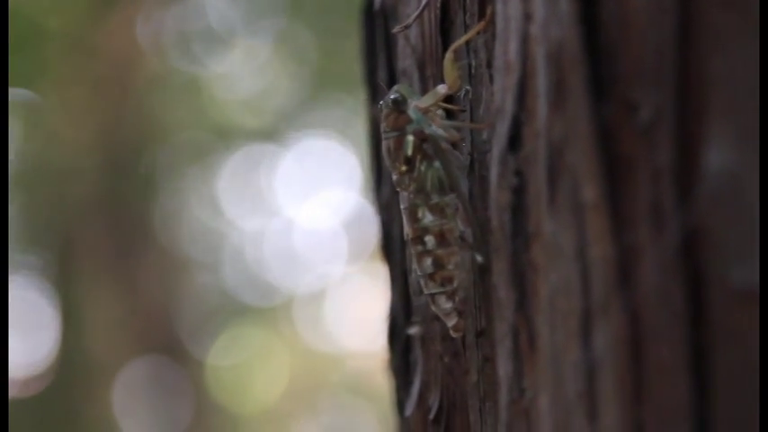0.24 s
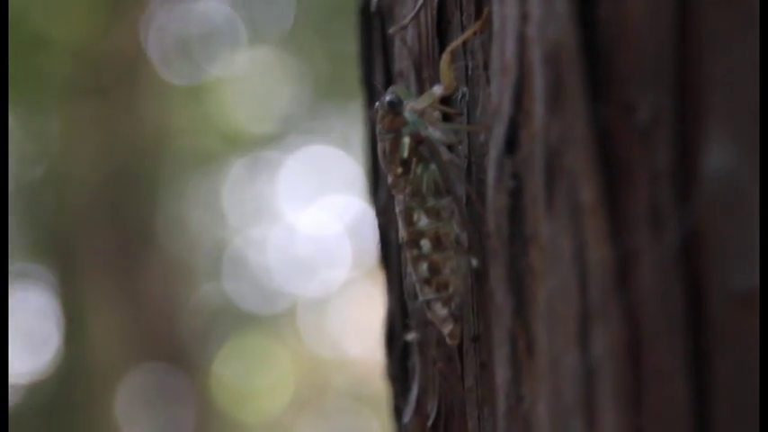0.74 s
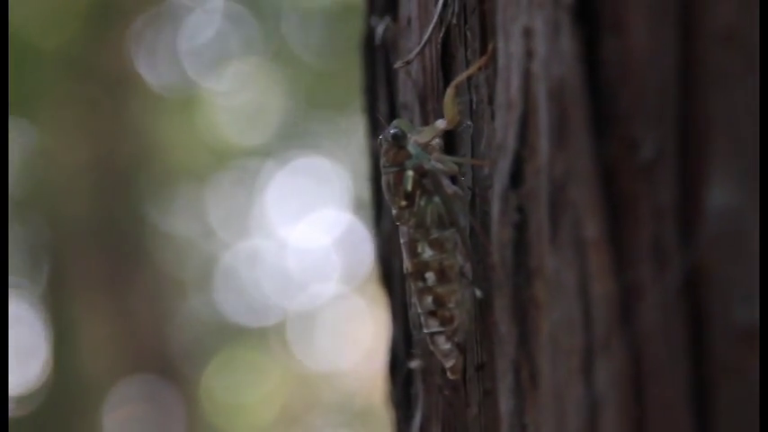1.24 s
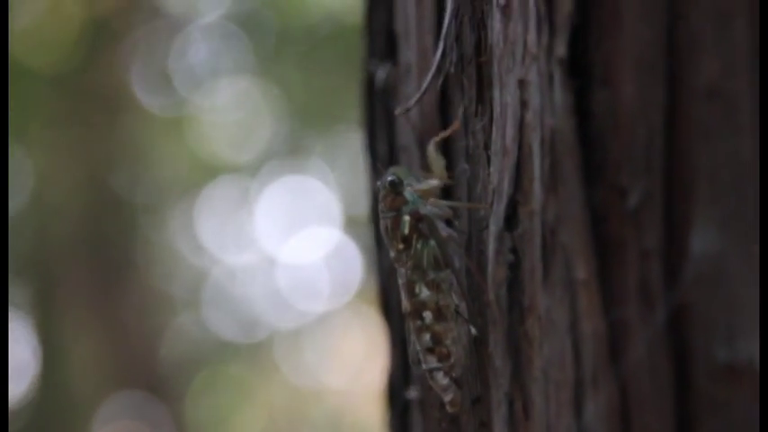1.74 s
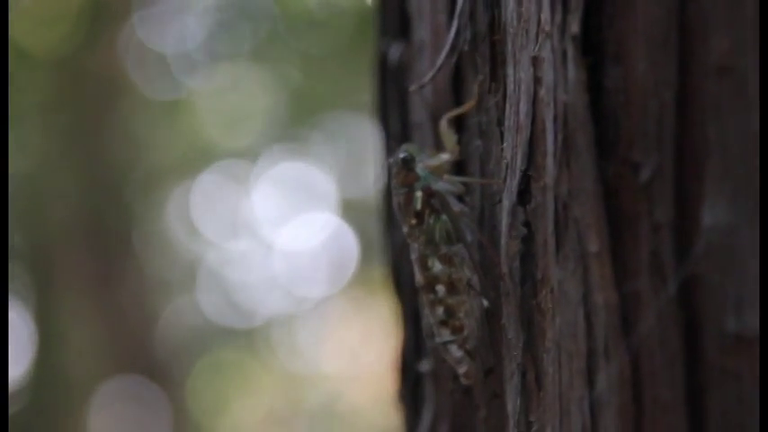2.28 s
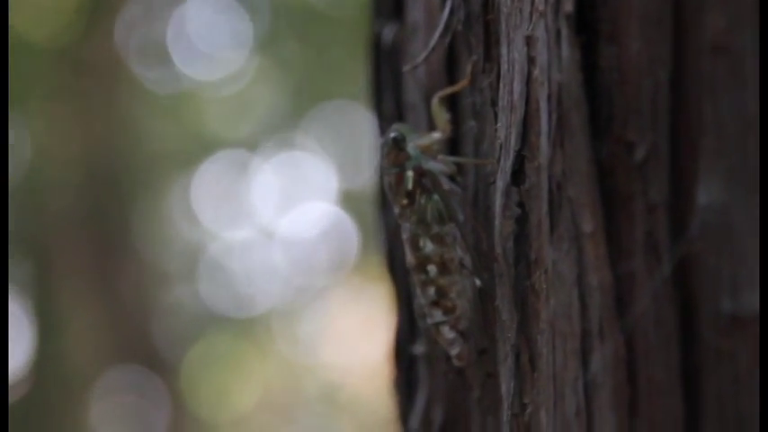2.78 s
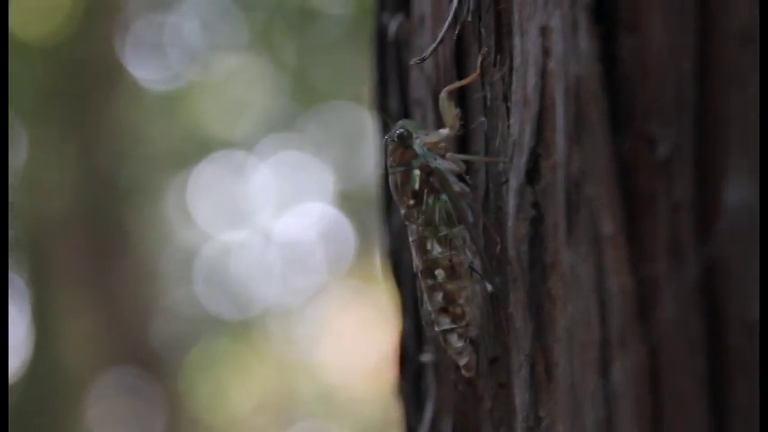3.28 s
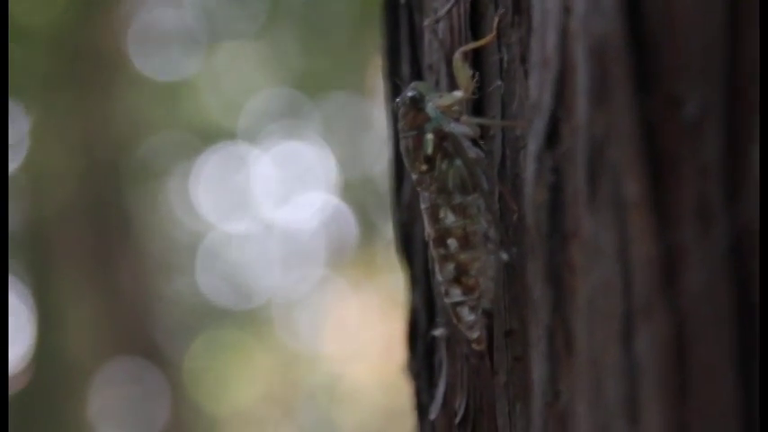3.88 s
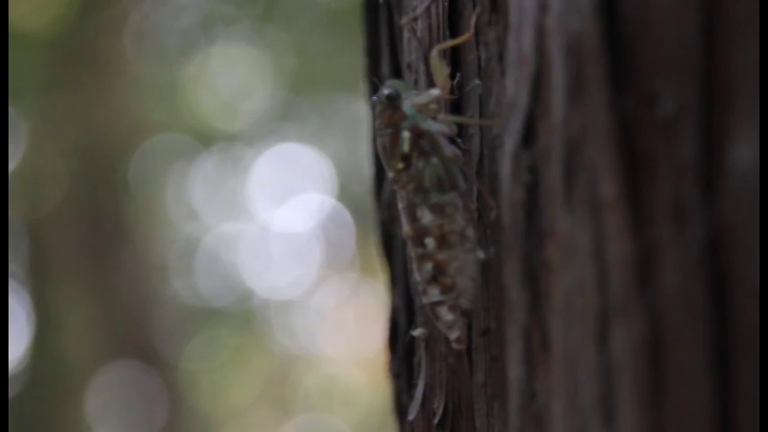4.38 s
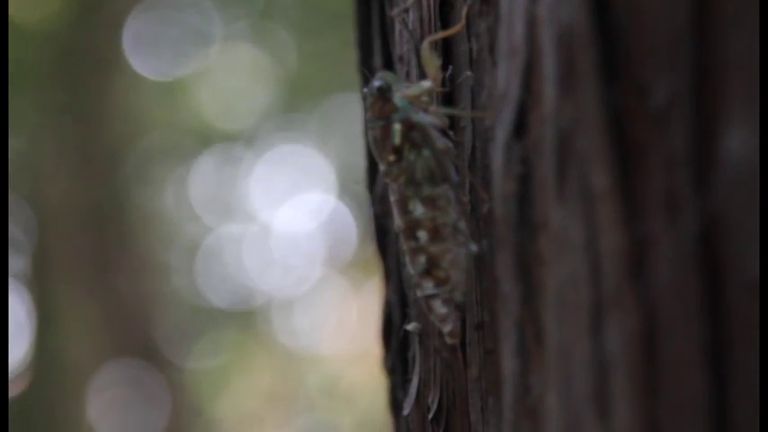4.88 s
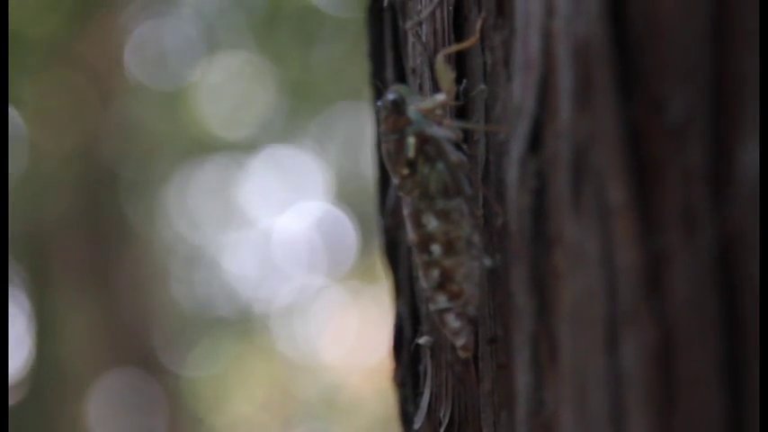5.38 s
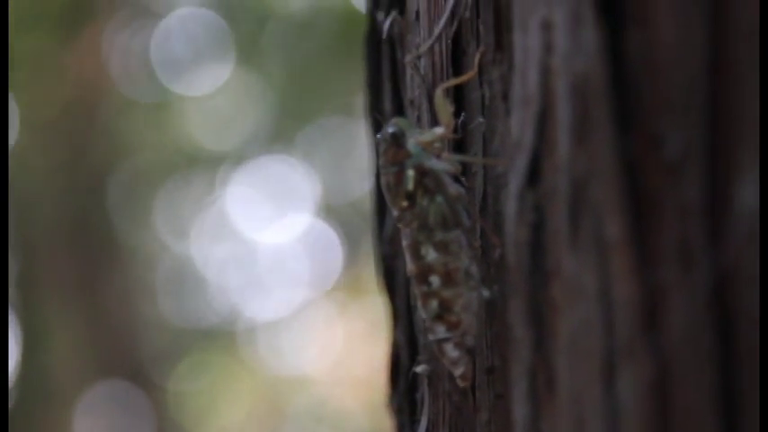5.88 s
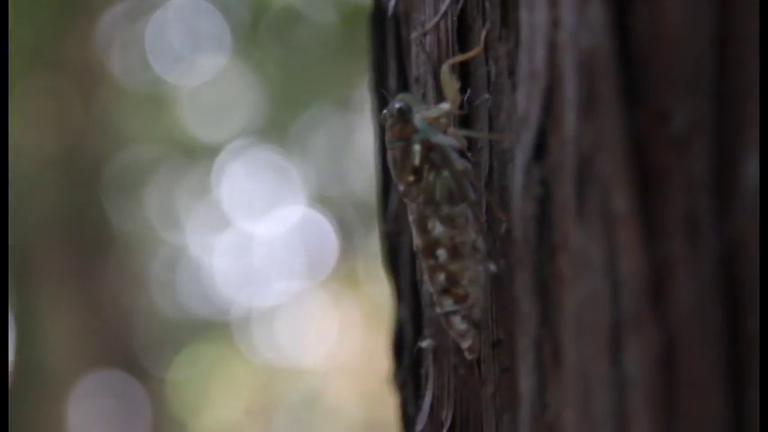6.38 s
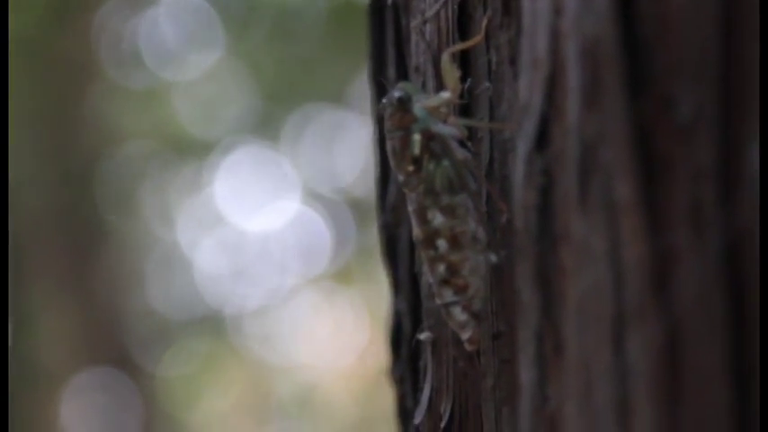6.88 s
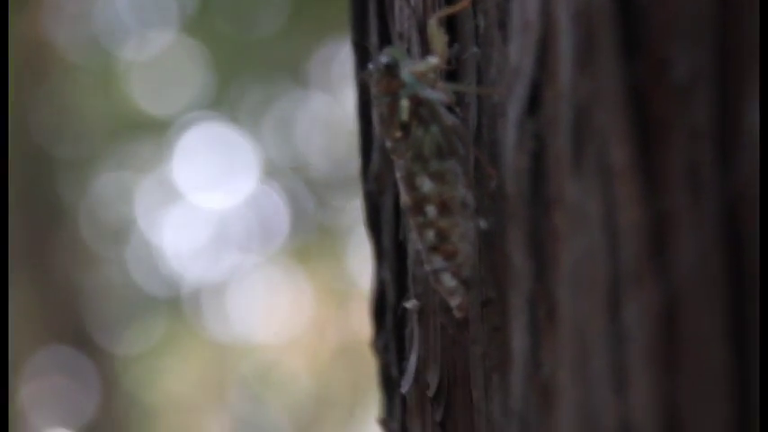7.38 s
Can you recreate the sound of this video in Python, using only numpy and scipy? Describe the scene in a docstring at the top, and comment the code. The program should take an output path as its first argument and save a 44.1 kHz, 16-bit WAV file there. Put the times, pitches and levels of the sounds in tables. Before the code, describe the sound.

A cicada chorus hisses steadily in a forest under a very high throbbing buzz. A cicada some trees away gives a fading run of quick ringing notes. Then one right by the microphone swells into a loud, rapidly pulsing call, slowing slightly before it stops suddenly. The chorus swells back and a far cicada answers faintly. Hands bump and rub the microphone dully, mostly near the end.

```python
"""Evening cicadas call in slowing runs of ringing notes: some trees away, then close, then far off.
Tymbal clicks ring the abdomen; each call warms up, peaks and tires, which sets the pitch, length
and colour of its notes. Behind them a cicada chorus hisses, a high insect buzz throbs and a far bird
whistles over faint forest air. Hands bump and rub the camera body; its gain control ducks the forest
under the close call and lets it swell back."""
import sys
import numpy as np
from scipy import signal
from scipy.fft import rfft, irfft, next_fast_len
from scipy.io import wavfile
from scipy.ndimage import uniform_filter1d, minimum_filter1d, map_coordinates

SR = 44100
rng = np.random.default_rng(int(sys.argv[2]) if len(sys.argv) > 2 else 0)


def transcribe(u):
    """Save the signal u as a 16-bit wav file named by the first command-line argument.

    u: samples, shape (n,) or (channels, n), limited to [-1, 1]; the rate is SR.
    q: integer samples, one column per channel.
    """
    v = np.clip(np.atleast_2d(u).T, -1, 1)
    q = np.round(v * 32767).astype(np.int16)
    wavfile.write(sys.argv[1], SR, q)


N = 336924

# Close cicada. Each entry: note onset in seconds.
NEAR_ONSETS_S = [3.495, 3.576, 3.662, 3.744, 3.825, 3.908, 3.985, 4.068, 4.153, 4.24, 4.330, 4.42, 4.514,
                 4.609, 4.706, 4.811, 4.911, 5.006, 5.111, 5.218, 5.329, 5.451, 5.592, 5.738]
# Cicada some trees away. Each entry: note onset in seconds.
MIDWAY_ONSETS_S = [1.250, 1.335, 1.415, 1.492, 1.565, 1.645, 1.728, 1.812, 1.890, 1.978, 2.070, 2.162,
                   2.256, 2.352, 2.458, 2.565, 2.690, 2.932]
# Far cicada. Each entry: note onset in seconds.
FAR_ONSETS_S = [6.455, 6.545, 6.635, 6.725, 6.82, 6.90, 6.995, 7.095, 7.195, 7.295, 7.43]
# Abdomen partials 3 to 6. Each entry: relative level in dB.
OVERTONES_DB = [-10.5, -3, -11, -23.5]
# Tymbal buckle. Each row: frequency in Hz, relative density in dB.
TICK_SPECTRUM = [(400, -15), (2000, 20), (5000, 7), (10000, 2), (14000, -38)]
# Radiation from the insect. Each row: frequency in Hz, gain in dB.
BODY_RESPONSE = [(300, 6.5), (1200, -19), (1550, -15.5), (1830, 2), (2200, 0.5), (2600, -7.5), (3200, -8.5),
                 (3650, -7.5), (3980, -2), (4700, -2.5), (6000, -5.5), (13000, 3.5), (15000, -8)]
# Forest tail at full reach. Each row: frequency in Hz, T60 in seconds.
FOREST_T60 = [(500, 0.17), (2100, 1), (4300, 0.87), (9000, 0.12)]
# Insect bed. Each row: time in seconds, chorus gain in dB, buzz gain in dB.
BED_GAINS = [(0, -18.5, -18), (1.35, -17, -19.5), (2.0, -20, -23.5), (3.0, -18, -21.5), (3.6, -18.7, -22.5),
             (5.6, -17.5, -22.5), (6.85, -16.5, -22), (7.15, -19, -27)]
# Chorus hiss. Each row: frequency in Hz, relative density in dB.
CHORUS_SPECTRUM = [(1880, -33.5), (3200, -52), (3680, -20), (4190, -7.5), (4740, -1.5), (5500, 2.5),
                   (7430, -9), (8670, -10), (9870, -16), (11000, -11), (14300, -7), (22000, -120)]
# Single chorus singers. Each row: centre in Hz, half-width in Hz, level in dB.
SINGERS = [(2844, 20, -50.5), (4230, 110, -42), (8420, 180, -35.5), (8920, 130, -37.5)]
# Farthest evening cicadas. Each row: time in seconds, gain in dB.
DISTANT_GAINS = [(0, -42.5), (1.7, -36), (2.6, -40), (6.6, -42), (7.64, -60)]
# High buzz. Each row: frequency in Hz, relative density in dB.
BUZZ_SPECTRUM = [(7000, -21), (10000, -36), (11500, -17), (13400, 1), (14500, -1.5), (16000, 2.5)]
# Hand knocks. Each row: start in seconds, level in dB, pitch in Hz.
HAND_BUMPS = [(.225, -22.5, 160), (0.491, -24.5, 108), (1.151, -31, 115), (1.813, -23, 130),
              (2.372, -21.5, 108), (2.445, -15, 127), (2.745, -14.5, 144), (3.268, -14, 197),
              (3.311, -14.5, 129), (5.241, -7, 208), (5.408, -8, 207), (5.541, -10, 186),
              (5.711, -15.5, 202), (5.79, -15, 177), (5.934, -12, 260), (5.984, -14, 240),
              (6.125, 0.5, 210), (6.238, -4.5, 204), (7.163, -18.5, 132), (7.324, -12, 265),
              (7.389, -21.5, 254), (7.494, -4, 155), (7.609, -2, 145)]
# Grip shifts. Each row: start in seconds, length in seconds, level in dB.
FINGER_RUBS = [(0.574, 0.15, -38), (1.116, 0.13, -34), (1.78, 0.09, -31.5), (2.706, .1, -26),
               (3.291, 0.083, -23.5), (3.852, 0.26, -25), (4.433, .14, -31), (5.01, 0.42, -26.5),
               (5.533, 0.34, -26.5), (6.221, 0.22, -25), (7.15, 0.48, -24.5)]
# Skin on the camera body. Each row: frequency in Hz, relative density in dB.
RUB_SPECTRUM = [(20, -20), (70, 4.5), (140, 4.5), (260, -7), (450, -25), (900, -44), (3000, -79)]
# Far bird. Each row: peak time in seconds, pitch in Hz, level in dB.
BIRD_WHISTLES = [(.96, 1053, -44.5), (3.08, 1020, -50)]
# Forest air. Each row: frequency in Hz, relative density in dB.
AIR_SPECTRUM = [(20, -59), (50, -2), (100, -16), (200, -13.5), (400, -6.5), (800, -10.5), (1500, -16.5),
                (2400, 1), (3300, -5), (6000, -13), (16000, -13)]


def evening_cicada(onsets_s, rest_hz, rise_hz, stamina_s, level_db, timid_db, tire_db_per_s,
                   jitter_s=8e-6, stretch=1, warm_up_s=.381, lock_s=.23, find_voice_s=.19):
    """Vigour builds fast and drains slowly; notes are soft, dry and ragged until the tymbal locks."""
    song = np.zeros(N)
    for start_s in onsets_s:
        age_s = start_s - onsets_s[0]
        cold = np.exp(-(age_s / warm_up_s) ** 3)
        unlocked = np.exp(-(age_s / lock_s) ** 3)
        timid = np.exp(-(age_s / find_voice_s) ** 1.44)
        fresh = max(1 - age_s / stamina_s, 0)
        vigour = (1 - cold) * fresh
        harsh_db = 2.03 * age_s  # a tiring singer's octave gives way to the other partials
        note = tymbal_note(length_s=stretch * (.0159 + .039 * min(age_s / .73, 1) * fresh),
                           pitch_hz=rest_hz + rise_hz * vigour,
                           low_db=-11 + 14 * unlocked + harsh_db,
                           bright_db=-8 - 13 * cold + harsh_db,
                           jitter_s=jitter_s * (1 + 7 * timid),
                           damping=1 + .83 * cold, soft_clicks=1 + 3 * timid)
        add(song, start_s, amp(level_db + timid_db * timid - tire_db_per_s * age_s) * note)
    return equalised(song, BODY_RESPONSE)


def tymbal_note(length_s, pitch_hz, low_db, bright_db, jitter_s, damping, soft_clicks,
                scoop=.032, scoop_s=.006, rise_s=.0013, tick_s=.0004):
    """The tymbal clicks on every seventh cycle of the abdomen's ring, topping it up in step."""
    t = np.arange(SR // 14) / SR
    t = t - scoop * scoop_s * (1 - np.exp(-t / scoop_s))  # pitch pulls up as the muscle tightens
    period_s = 7 / pitch_hz
    clicks_s = np.arange(20) * period_s
    scatter, size = rng.standard_normal((2, len(clicks_s)))
    offsets_s = jitter_s * scatter * np.exp(-clicks_s / .03)
    age_s = np.maximum(t - (clicks_s + offsets_s)[:, None], 0)
    lead_in_db = -12 * np.exp(-(clicks_s / period_s / soft_clicks) ** 2)
    gate = np.clip(2 * (length_s - clicks_s) / period_s - .5, 0, 1)
    force = gate * amp(.5 * size + lead_in_db)
    hard = 1 / (1 + (clicks_s / (.052 * amp(bright_db))) ** 8)  # early clicks are rich in overtones
    cycles = (1 - .0089) * pitch_hz * age_s  # the free ring is slightly flat
    strike = 1 - np.exp(-age_s / rise_s)

    def partial(k, weight, decay_s=.0019):
        envelope = strike * np.exp(-damping * age_s / decay_s)
        return (force * weight) @ (envelope * np.sin(2 * np.pi * k * cycles))

    upper = sum(amp(bright_db + db) * partial(k, 2.6 * hard + .16, decay_s=.0012)
                for k, db in enumerate(OVERTONES_DB, 3))
    ring = unit(amp(low_db) * partial(1, .59) + partial(2, 1.25 - .31 * hard) + upper)
    ticks = (force * (hard + .54)) @ (np.exp(-age_s / tick_s) * (age_s > 0))
    note = ring + amp(-23) * coloured(ticks * rng.standard_normal(len(t)), TICK_SPECTRUM)
    return note / np.sqrt(np.sum(note ** 2) / (length_s * SR))


def through_trees(x, wet_db=-5):
    """A farther singer faces another way, which changes its colour, and has more echo."""
    x = equalised(x, [(1800, -5.5), (2100, -1.5), (4300, -6.5), (6400, 13.5), (8500, 2), (11000, -4)])
    return x + amp(wet_db) * forest_echo(x)


def forest_echo(x, reach=1):
    """Trunks scatter a diffuse tail that loses treble first; a close singer stirs only the nearest."""
    hz, t, bins = signal.stft(rng.standard_normal(SR), SR, nperseg=256)
    decay = amp(-60 * t / reach / along(FOREST_T60, hz)[:, None])
    tail = signal.istft(bins * decay, SR, nperseg=256)[1]
    return signal.fftconvolve(np.pad(x, (300, 0)), tail / np.linalg.norm(tail))[:N]


def chorus(gain_db, flutter_hz=11, note_rate_hz=10):
    """Many cicadas merge into a fluttering hiss; single singers and distant notes stand out."""
    flutter_db = .091 * narrow(flutter_hz, 2.5) + .5 * wobble(60)
    hiss = amp(gain_db + .43 + flutter_db) * noise(CHORUS_SPECTRUM)
    singers = sum(amp(db + .54 * wobble(4.3)) * narrow(hz, width_hz) for hz, width_hz, db in SINGERS)
    note_cycles = np.cumsum(note_rate_hz * (1 + .212 * wobble(4.2))) / SR
    pulse_db = 3.8 * np.sin(2 * np.pi * note_cycles) - 1.5  # notes half washed out by the trees
    distant = amp(curves(DISTANT_GAINS)[0] + pulse_db) * narrow(2143, 52)
    return hiss + singers + distant


def high_buzz(gain_db, click_hz=385, snap_s=.00044, throb_hz=15.5):
    """Two tymbals click in turn, one harder than the other, in a steady throb."""
    t = np.arange(N) / SR
    cycles = np.cumsum(click_hz * (1 + .034 * wobble(25))) / SR
    count = cycles.astype(int)
    force = amp(4.1 * rng.standard_normal(8192)[count] - 3.3 * (count % 2))
    clicks = .87 + force * np.exp(-(cycles % 1) / click_hz / snap_s)
    throb = amp(2.7 * np.cos(2 * np.pi * throb_hz * (t - .02)))
    return amp(gain_db + 1.1) * coloured(clicks * throb * rng.standard_normal(N), BUZZ_SPECTRUM)


def hand_bumps(t60_s=.067, rise_s=.0026):
    """Each bump is a dull push on the camera body, then a short rumble."""
    track, t = np.zeros(N), np.arange(SR // 2) / SR
    envelope = amp(-60 * t / t60_s) * (1 - np.exp(-t / rise_s))
    for start_s, db, pitch_hz in HAND_BUMPS:
        half_cycles = 2 * pitch_hz * t
        push = np.sin(np.pi * half_cycles) * half_cycles * np.exp(1 - half_cycles)
        white = rng.standard_normal(len(t))
        rumble = unit(filtered(white, lambda hz: (hz / pitch_hz) ** 1.3 / (1 + (hz / pitch_hz) ** 4.2)))
        add(track, start_s, amp(db) * (.66 * push + .9 * rumble * envelope))
    mic_bass_cut = signal.butter(2, 60, "highpass", fs=SR, output="sos")
    return signal.sosfilt(mic_bass_cut, track)


def grip(hold_db=-45.5, lumps_db=4, stick_db=4):
    """Holding fingers rumble faintly; shifting ones stick and slip in a swelling rub."""
    t = np.arange(N) / SR
    rumble = noise([(20, -18), (70, 2.5), (160, -5), (350, -8), (900, -45), (3000, -80)])
    holding = amp(hold_db) * unit(amp(lumps_db * wobble(17)) * rumble)
    strokes = sum(amp(db) * np.sin(np.pi * np.clip((t - start_s) / length_s, 0, 1))
                  for start_s, length_s, db in FINGER_RUBS)
    friction = unit(amp(stick_db * wobble(45)) * noise(RUB_SPECTRUM))
    return holding + strokes * friction


def bird(fade_s=.045):
    """Short soft whistles from far off."""
    t = np.arange(N) / SR
    return sum(amp(db) * np.exp(-((t - peak_s) / fade_s) ** 2) * narrow(hz, 28)
               for peak_s, hz, db in BIRD_WHISTLES)


def forest_air(level_db=-39):
    """The forest's steady noise floor."""
    return amp(level_db) * noise(AIR_SPECTRUM)


def amp(db):
    """Decibels to gain."""
    return 10 ** (np.asarray(db) / 20)


def unit(x):
    """Scale to rms 1."""
    return x / np.sqrt(np.mean(x ** 2) + 1e-20)


def along(points, hz):
    """Interpolate (Hz, value) points on a log axis."""
    knots_hz, values = np.transpose(points)
    return np.interp(np.log(hz + 1), np.log(knots_hz + 1), values)


def curves(rows):
    """One value per sample for each column after the time."""
    times_s, *columns = np.transpose(rows)
    return [np.interp(np.arange(N) / SR, times_s, column) for column in columns]


def wobble(rate_hz):
    """Smooth random curve with knots at rate_hz."""
    return map_coordinates(rng.standard_normal(4096), [np.arange(N) * rate_hz / SR], mode="wrap")


def filtered(x, response):
    """Apply a gain given as a function of Hz."""
    size = next_fast_len(len(x) + 8192)
    return irfft(rfft(x, size) * response(np.fft.rfftfreq(size, 1 / SR)), size)[:len(x)]


def equalised(x, points):
    """Filter by (Hz, dB) points."""
    return filtered(x, lambda hz: amp(along(points, hz)))


def coloured(x, spectrum):
    """Equalise, then scale to rms 1."""
    return unit(equalised(x, spectrum))


def noise(spectrum):
    """Noise shaped by (Hz, dB) points, rms 1."""
    return coloured(rng.standard_normal(N), spectrum)


def narrow(centre_hz, half_width_hz):
    """Fuzzy tone, rms 1."""
    white = rng.standard_normal(N)
    return unit(filtered(white, lambda hz: 1 / (1 + ((hz - centre_hz) / half_width_hz) ** 2)))


def add(track, start_s, x):
    """Mix x into the track."""
    part = track[max(round(start_s * SR), 0):][:len(x)]
    part += x[:len(part)]


def scene():
    """Three calls, the forest and the hands reach one microphone."""
    near = evening_cicada(NEAR_ONSETS_S, rest_hz=2028, rise_hz=164.1, stamina_s=3.2,
                          level_db=10.5, timid_db=-30, tire_db_per_s=1.12, jitter_s=3e-5)
    midway = evening_cicada(MIDWAY_ONSETS_S, rest_hz=2057, rise_hz=176.5, stamina_s=1.73,
                            level_db=-11, timid_db=-19.5, tire_db_per_s=8, stretch=.9)
    far = evening_cicada(FAR_ONSETS_S, rest_hz=2055, rise_hz=100, stamina_s=1.3,
                         level_db=-24, timid_db=-6, tire_db_per_s=2, stretch=.9)
    calls = near + amp(-32) * forest_echo(near, reach=.6) + through_trees(midway + far)
    chorus_db, buzz_db = curves(BED_GAINS)
    bed = forest_air() + chorus(chorus_db) + high_buzz(buzz_db) + bird()
    mono = calls + bed + hand_bumps() + grip()
    return np.array([mono, mono])


def record(dry, ceiling_db=-4.5, recovery_db_per_s=17, attack_s=.00033, top_hz=15950):
    """Gain control drops fast on peaks and climbs back steadily; clipping and a low-pass follow."""
    peak = -minimum_filter1d(-np.abs(dry[0]), size=16)
    peak_db = 20 * np.log10(np.abs(uniform_filter1d(peak, size=64)) + 1e-9)
    excess_db = np.maximum(peak_db - ceiling_db, 0)
    climb_db = recovery_db_per_s * np.arange(N) / SR
    cut_db = np.maximum.accumulate(excess_db + climb_db) - climb_db
    pole = np.exp(-1 / (attack_s * SR))
    gain = amp(-signal.lfilter([1 - pole], [1, -pole], cut_db))
    return np.array([filtered(np.clip(x * gain, -1, 1), lambda hz: hz < top_hz) for x in dry])


dry = scene()
out = record(dry)
transcribe(out)
```